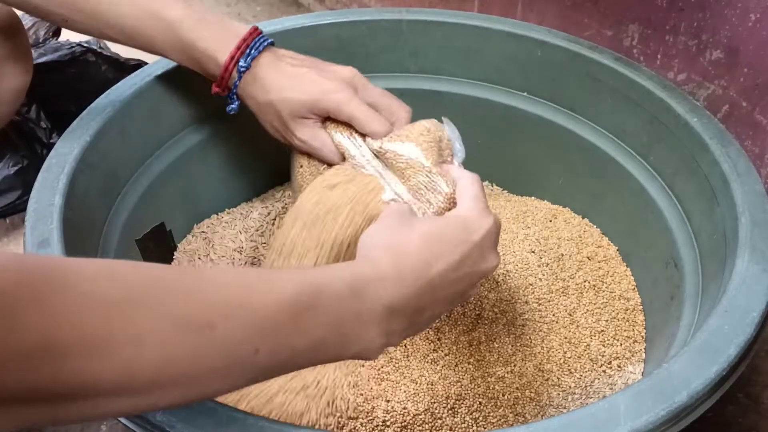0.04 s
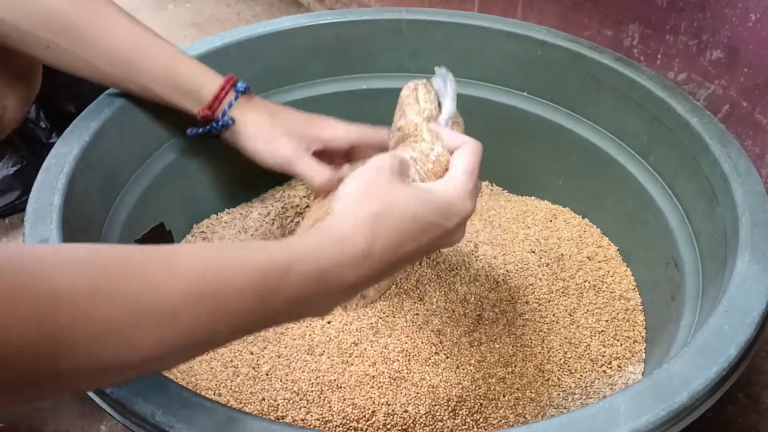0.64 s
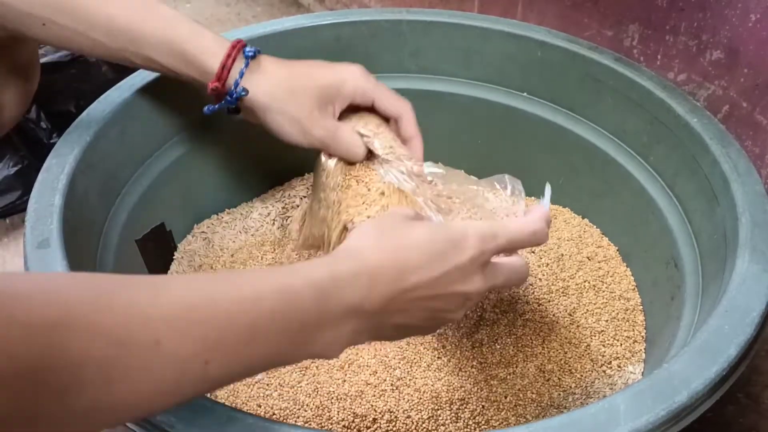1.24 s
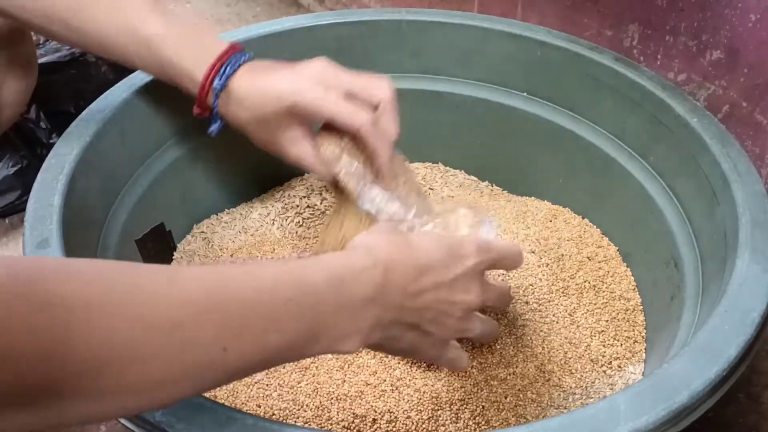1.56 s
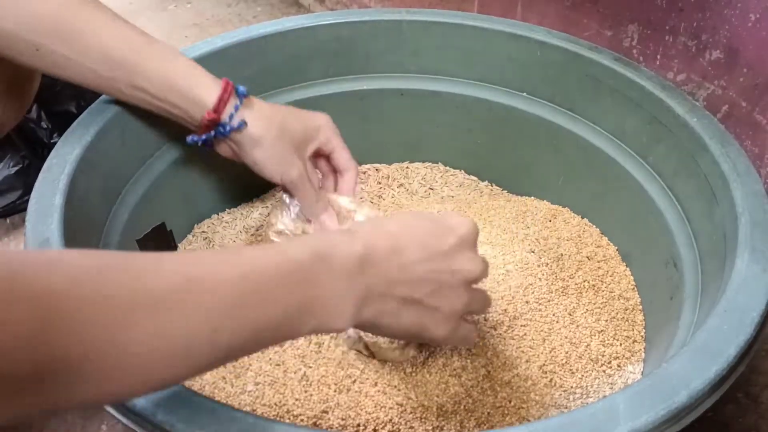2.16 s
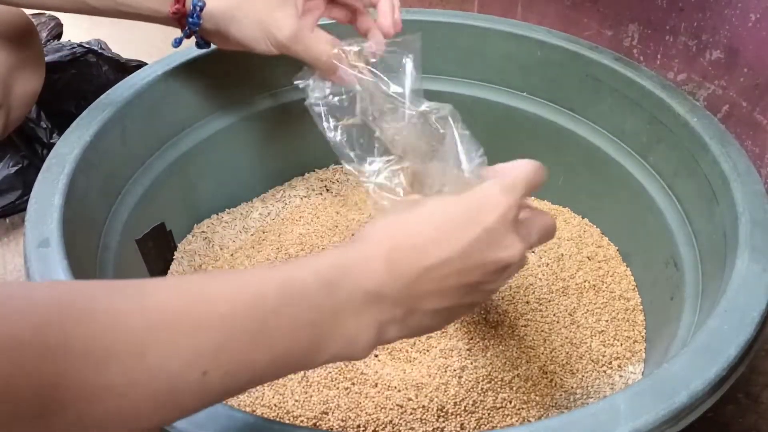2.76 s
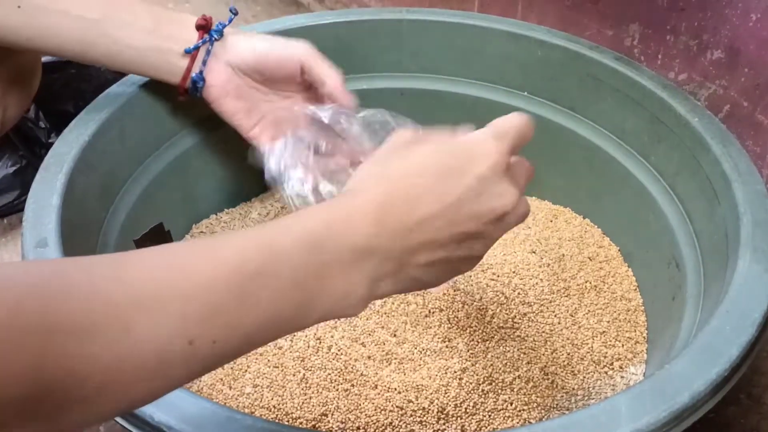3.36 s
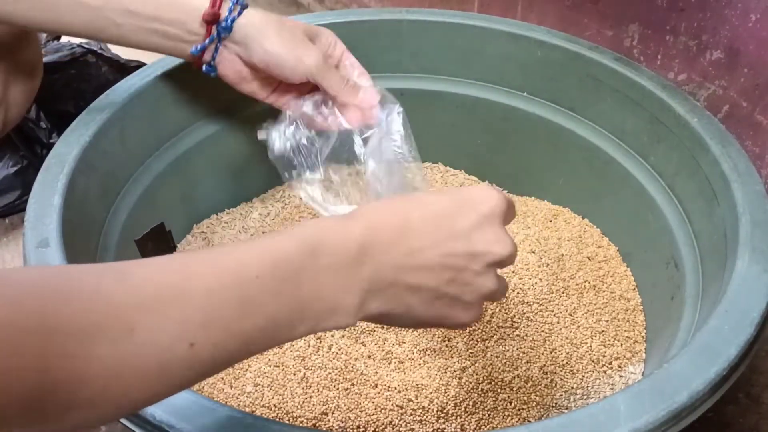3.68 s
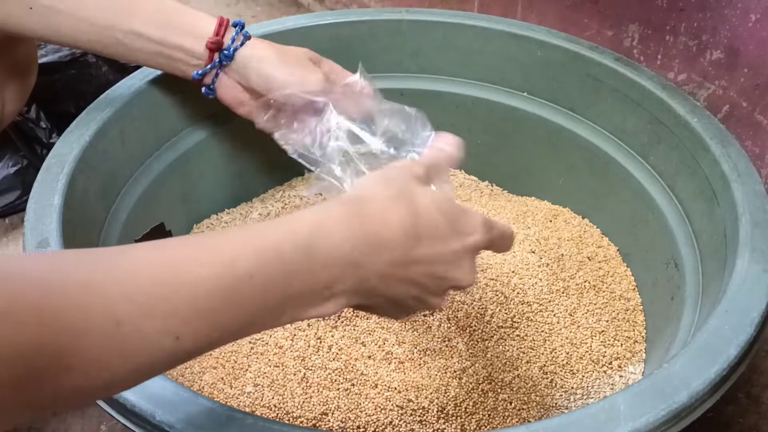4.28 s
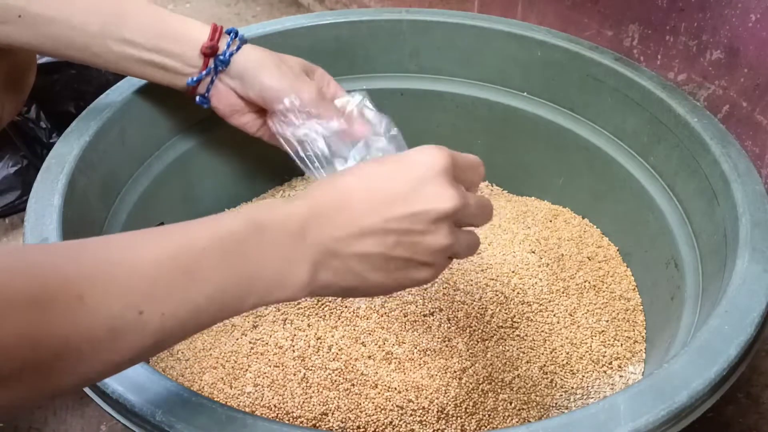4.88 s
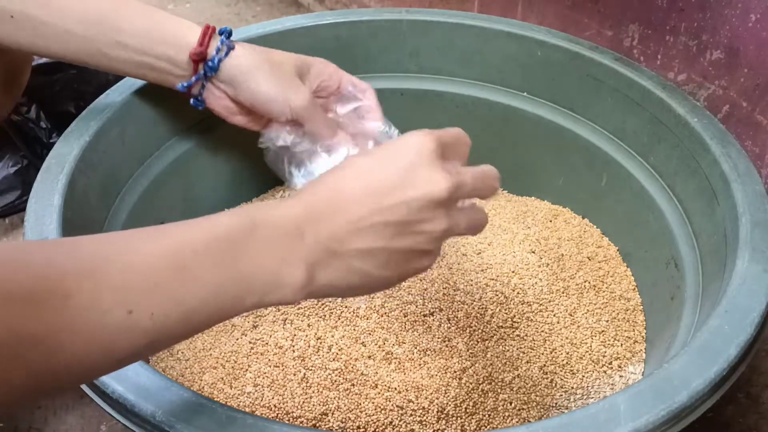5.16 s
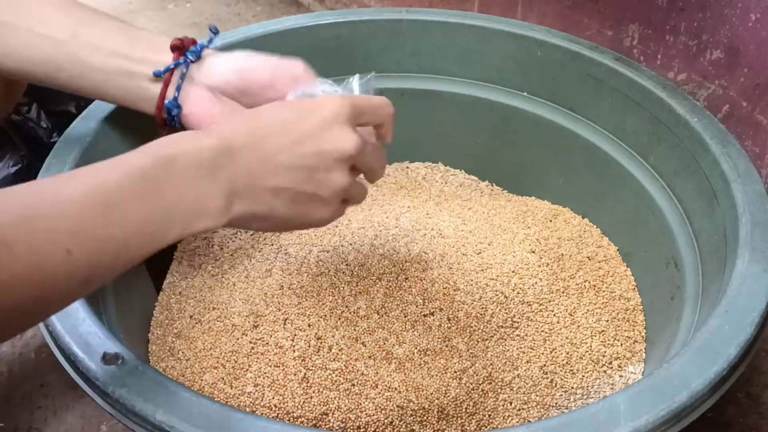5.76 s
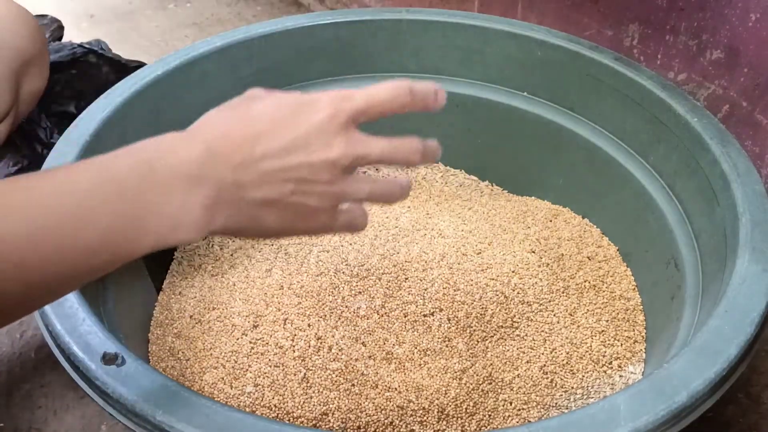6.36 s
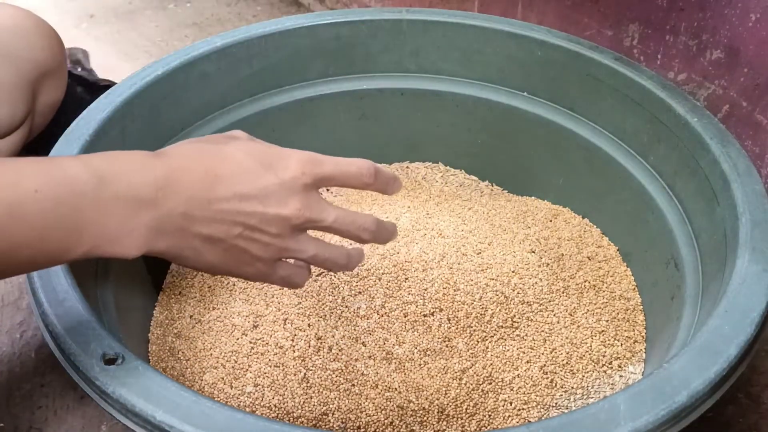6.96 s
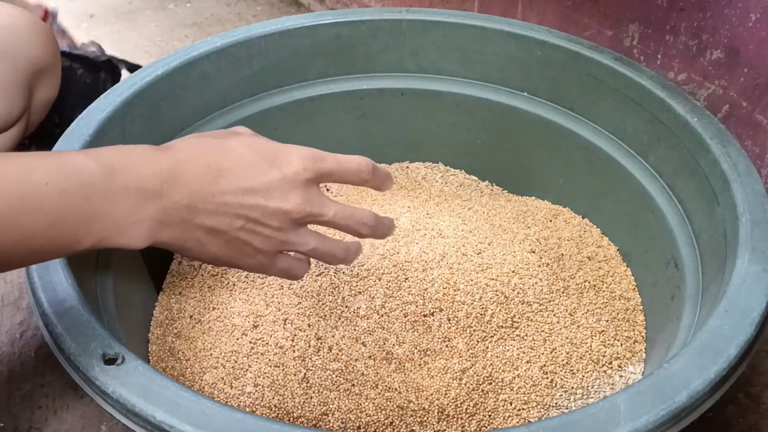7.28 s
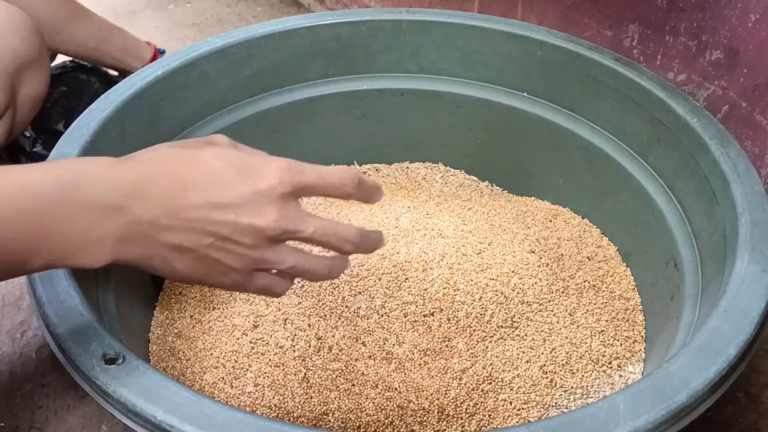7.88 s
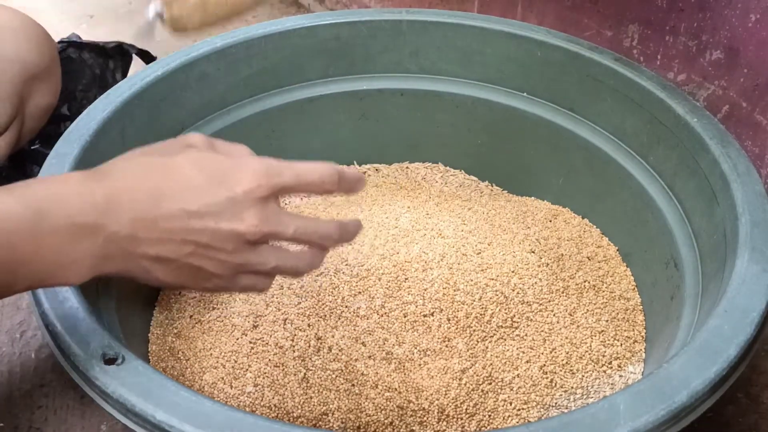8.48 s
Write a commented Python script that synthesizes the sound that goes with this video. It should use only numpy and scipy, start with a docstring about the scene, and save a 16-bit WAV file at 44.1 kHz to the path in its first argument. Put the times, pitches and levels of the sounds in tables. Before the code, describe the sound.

Close to the microphone, a fine, bright patter of seeds lands on grain in a plastic basin, with occasional sharp cracks from the bag they spill out of. The pour dies away, a parrot gives a loud squawk, and the thin empty bag crinkles in bursts before fading to light rustles. Brief whistles and raspy calls from small parrots echo in the room through most of this, above a low hum of faraway traffic.

```python
"""Small dry seeds pour from a thin plastic bag onto a heap of grain, thousands of tiny hits a second,
and the plastic basin under them murmurs. The empty bag is shaken out, crumpled and put aside,
crackling as its creases flip. Small parrots whistle and squawk in the hard-walled room, which echoes,
and traffic rumbles far off. A phone's two microphone openings each colour the treble in their own way."""
import sys
import numpy as np
from scipy import signal
from scipy.fft import rfft, irfft, next_fast_len
from scipy.io import wavfile
from scipy.ndimage import uniform_filter1d

SR = 44100
rng = np.random.default_rng(int(sys.argv[2]) if len(sys.argv) > 2 else 0)


def unload_audio(sound):
    """Save the sound as a 16-bit wav file, at the path given as the first command line argument."""
    columns = np.transpose(np.atleast_2d(sound))
    # keep every value between -1 and 1, then stretch to whole-number steps
    steps = np.round(np.clip(columns, -1, 1) * 32767)
    wavfile.write(sys.argv[1], SR, steps.astype(np.int16))


N = 376173
TIME = np.arange(N) / SR
CUTOFF_HZ = 15550   # the phone keeps nothing higher
CALL_RISE_S, CALL_FADE_S = 0.0027, 0.0052   # how fast a bird call starts and stops

# tone of the bag's thin plastic: (frequency [Hz], gain [dB])
BAG_TONE = [(100, -7), (250, -5), (450, -15.5), (1000, -6), (1700, -3), (2300, 3.5), (3200, 4), (5000, 4),
            (8000, 4), (12000, -2.5), (16000, -4.5)]


def seeds(stream):
    """Thousands of seeds a second tick on the heap; a stronger stream brings more of them."""
    # tone of seeds hitting grain: (frequency [Hz], gain [dB])
    seed_tone = [(100, -16), (250, -10), (450, -2.5), (1000, -3.5), (1700, -1), (2300, 3.5), (3200, 4),
                 (5000, 3), (8000, 3.5), (12000, -1.5), (16000, -1)]
    flow = stream * from_db(1.5 * drift(40))
    hits = ticks(per_s=14000 * flow / flow.max(), size_db=2.5, ring_s=0.00044)
    return flow * rms_one(colour(spread(hits), seed_tone))


def bag(effort):
    """The thin plastic buckles in little bursts of crackles, more of them when it is squeezed harder."""
    crackles = ticks(per_s=1200 + 6000 * effort / effort.max(), size_db=-0.4, ring_s=0.001)
    crackles *= from_db(1.4 * drift(70))
    return effort * rms_one(colour(spread(crackles), BAG_TONE))


def snaps(decay_s=0.0036, gain_db=-11):
    """A big crease in the bag flips over with a sharp crack."""
    # the biggest creases flipping: (time [s], level before gain_db [dB])
    flips = [(0.058, -21.5), (1.1383, -20), (1.57, -24), (1.7718, -18.5), (2.0902, -15), (2.4534, -17.5),
             (3.0236, -21), (3.666, -15), (4.8368, -21), (5.3432, -23.5), (6.2402, -31)]
    out = np.zeros((2, N + SR))
    t = TIME[:SR // 50]
    for s, db in flips:
        at = int(s * SR)
        crack = np.exp(-t / decay_s) * rng.standard_normal((2, len(t)))
        out[:, at:at + len(t)] += from_db(db + gain_db) * crack
    return colour(out[:, :N], BAG_TONE)


def creases(motion, gain_db=-14.5):
    """Whenever the bag moves, full or empty, small creases flip at random."""
    cracks = ticks(per_s=22, size_db=2.5, ring_s=0.0021)
    return from_db(gain_db) * motion * rms_one(colour(cracks, BAG_TONE))


def basin(drive):
    """Shifting grain drums softly on the plastic wall, which answers with a hollow murmur."""
    # tones at which the filled basin rings: (frequency [Hz], width [Hz], gain [dB])
    wall_tones = [(276, 22, -1.5), (381, 42, -0.5), (469, 51, 1.5), (659, 66, -2), (817, 140, -8),
                  (1280, 370, -10.5)]
    drumming = spread(ticks(per_s=1500, size_db=2.0, ring_s=0.00095))
    wall = np.zeros((2, N))
    for k, (hz, width, db) in enumerate(wall_tones):
        ringing = signal.lfilter(*signal.iirpeak(hz, hz / width, fs=SR), drumming)
        wall += (-1) ** k * from_db(db) * ringing   # every second tone swings the opposite way
    muffle = signal.butter(2, 1800, fs=SR, output="sos")
    return drive * rms_one(signal.sosfilt(muffle, wall))


def parrots():
    """The long cry and all the short calls, each placed at its time."""
    # short calls, from clear chirps to harsh squawks: (time [s], length [s], start pitch [Hz],
    # end pitch [Hz], level [dB], brightness [dB per octave], rasp [0-1])
    chirps = [(0.663, .013, 5340, 5385, -20, 7, .15), (0.787, 0.025, 2750, 2900, -30.5, -1, 0.94),
              (.797, 0.028, 2856, 2785, -20.5, -2, .05), (.82, 0.026, 2713, 2545, -19.5, 2.5, 0.3),
              (0.848, 0.044, 6720, 6660, -28.5, -8, .1), (0.922, 0.019, 4470, 4240, -22.5, -3, 0.53),
              (.941, .04, 2614, 2608, -25, 0, 0.61), (1.042, 0.035, 3780, 4200, -27, -20, 0.87),
              (1.06, .03, 2484, 2360, -33.5, -7, 0.8), (1.154, 0.081, 1890, 1710, -43, -7.5, 0.96),
              (1.974, 0.02, 4796, 4940, -20, -1, 0.28), (1.998, 0.054, 2370, 2290, -35.5, -3, 0.53),
              (2.07, 0.044, 2260, 2080, -47, -5, .3), (3.286, 0.015, 5500, 5540, -32, -9, 0.23),
              (3.317, 0.032, 4970, 5135, -24, 2.5, .5), (3.424, 0.015, 4256, 4200, -20.5, 4, 0.6),
              (3.426, 0.016, 2885, 2900, -18, 4.5, 0.89), (3.441, 0.031, 6130, 6450, -20, 2.5, 0.37),
              (3.583, 0.029, 2150, 2005, -36, -1.5, 0.2), (3.607, .012, 5560, 5870, -25, -2, 0.33),
              (3.992, 0.011, 2060, 2050, -37, -3, 0.04), (4.003, 0.035, 2604, 2630, -31.5, -2.5, 0.47),
              (4.06, 0.026, 6530, 5120, -22, -5, 0.2), (4.144, 0.024, 4484, 4244, -23, 2, 0.47),
              (4.146, 0.017, 5760, 5350, -27, -13, 0.4), (5.689, 0.024, 5710, 5360, -26, 1.5, 0.32),
              (5.828, 0.083, 3076, 3235, -41, -4, 0.97), (5.888, 0.034, 3355, 3487, -29, 4, 0.07),
              (5.919, 0.018, 5600, 5400, -36, -8, .1), (5.934, 0.031, 4320, 4110, -29.5, 7, 0.25),
              (6.263, 0.015, 7150, 6630, -35, -9, 0.1), (6.293, 0.031, 2260, 2680, -45, -9, 0.4),
              (6.32, .049, 4050, 4630, -37, 5, .55)]
    out = np.zeros(N + SR)
    calls = [long_cry()] + [(s, chirp(*row)) for s, *row in chirps]
    for s, call in calls:
        at = int(s * SR)
        out[at:at + len(call)] += call
    return out[:N]


def chirp(length, start_hz, end_hz, db, brightness_db, rasp):
    """A short call: the pitch glides along a slight arch while the level rises, holds and fades."""
    t = TIME[:SR // 10]
    along = np.minimum(t / length, 1)
    arch = 1 + 0.01757 * np.sin(np.pi * along)
    glide = (start_hz + (end_hz - start_hz) * along) * arch
    shape = np.clip(t / CALL_RISE_S, 0, 1) * np.clip((length - t) / CALL_FADE_S + .5, 0, 1)
    return from_db(db) * shape * bird_voice(glide, brightness_db, rasp)


def long_cry():
    """A hoarse call clears as it climbs, then drops and breaks off. Gives its start time and sound."""
    # course of the cry: (time [s], pitch [Hz], level [dB], rasp [0-1])
    course = [(6.453, 1647, -38, .5), (6.479, 1604, -35.5, 0.54), (6.497, 1630, -41, 0.1),
              (6.519, 1790, -30.5, .25), (6.594, 2043, -33, 0.23), (6.612, 1767, -31, 0.12),
              (6.622, 1696, -36, 0.2)]
    times, *columns = np.transpose(course)
    start, end = times[0], times[-1]
    t = start + TIME[:SR // 4]
    hz, db, rasp = [np.interp(t, times, column) for column in columns]
    shape = np.clip(np.minimum((t - start) / CALL_RISE_S, (end - t) / CALL_FADE_S), 0, 1)
    return start, from_db(db) * shape * bird_voice(hz, brightness_db=-5.5, rasp=rasp)


def bird_voice(glide, brightness_db, rasp):
    """A whistle with overtones, shaped by the throat; rasp shakes it into a hissing screech."""
    # how the throat lifts or weakens each overtone: (frequency [Hz], gain [dB])
    throat = [(1600, -6.5), (2200, 3), (2800, -6), (3700, 10), (5300, 3.5), (6600, 1), (8200, -5),
              (9400, -10.5), (11000, -7), (13500, -16), (16000, -21)]
    size = len(glide)
    quaver = .012 * drift(350, size)
    wobble = 0.085 * rasp * drift(1150, size)
    phase = 2 * np.pi * np.cumsum(glide * (1 + quaver + wobble)) / SR
    whistle = sum(from_db(at_hz(throat, k * glide) + brightness_db * np.log2(k)) * np.sin(k * phase)
                  for k in range(1, int(CUTOFF_HZ / glide.min()) + 1))
    flutter = 1 + 0.78 * np.tanh(2 * rasp * drift(900, size))
    hiss_band = signal.butter(2, [2500, 8500], "band", fs=SR, output="sos")
    hiss = signal.sosfilt(hiss_band, rng.standard_normal(size))
    return rms_one(whistle * flutter) + 0.18 * rasp * rms_one(hiss)


def bumps(swell_s=0.0097):
    """Soft thuds that swell and die within a few hundredths of a second."""
    # dull low thuds: (time [s], level [dB], rough pitch [Hz])
    thuds = [(.48, -54, 480), (1.969, -44.5, 350), (2.3, -55, 50), (3.446, -45, 140), (3.446, -47, 650),
             (5.551, -55, 340)]
    out = np.zeros(N + SR)
    t = TIME[:SR // 4]
    shape = t / swell_s * np.exp(1 - t / swell_s)
    for s, db, hz in thuds:
        band = signal.butter(2, [hz / 2, hz * 1.44], "band", fs=SR, output="sos")
        thud = rms_one(signal.sosfilt(band, rng.standard_normal(len(t))))
        at = int(s * SR)
        out[at:at + len(t)] += from_db(db) * shape * thud
    return out[:N]


def street(engine_hz=137):
    """Far traffic rumbles, and one engine drones with a wavering pitch and level."""
    # tone of the rumble: (frequency [Hz], gain [dB])
    traffic_tone = [(20, -7), (30, -5), (41, 12), (52, -6.5), (90, -3.5), (125, -1), (190, -2.5),
                    (270, -8.5), (400, -3), (700, -8.5), (1500, -11.5), (4000, -10.5), (16000, -26.5)]
    # loudness of the rumble: (time [s], level [dB])
    traffic_levels = [(0, -52), (1.3, -49), (3.3, -50), (4.3, -56), (5.6, -53.5), (7.2, -50), (8.53, -53)]
    # loudness of the engine: (time [s], level [dB])
    engine_levels = [(0, -91), (3, -69), (4.2, -66), (5.5, -67.5), (6.2, -61), (6.5, -67.5), (7.15, -54.5),
                     (7.5, -66.5), (8.53, -70)]
    rumble = rms_one(colour(spread(rng.standard_normal((2, N))), traffic_tone))
    phase = 2 * np.pi * np.cumsum(engine_hz * (1 + 0.013 * drift(17))) / SR
    drone = from_db(in_time(engine_levels) + 2.0 * drift(9)) * rms_one(np.sin(phase))
    return from_db(in_time(traffic_levels)) * rumble + drone


def swells(rows, rise_share=.48, steepness=2.2):
    """A loudness curve with one rounded rise and fall per row; overlapping ones add in power."""
    power = np.zeros(N)
    for s, length, db in rows:
        near = slice(max(int((s - 2 * length) * SR), 0), int((s + 2 * length) * SR))
        t = TIME[near] - s
        away = np.abs(t) / (length * np.where(t < 0, rise_share, 1 - rise_share))
        power[near] += (from_db(db) * np.exp(-away ** steepness)) ** 2
    return np.sqrt(power)


def ticks(per_s, size_db, ring_s):
    """Tiny random hits of uneven size; each is a short burst of noise, different left and right."""
    chance = np.clip(per_s / SR, 1e-4, 1)
    sizes = from_db(size_db * np.minimum(rng.exponential(1, N), 5))
    energy = (rng.random(N) < chance) * sizes ** 2 / chance
    fading = signal.lfilter([1], [1, -np.exp(-2 / (ring_s * SR))], energy + 1e-18)
    return rms_one(np.sqrt(fading) * rng.standard_normal((2, N)))


def echoes(x, fade_s, gap_s):
    """The walls send back a blur of echoes that starts after gap_s and falls 60 dB in fade_s."""
    t = TIME[:SR // 2]
    tail = rng.standard_normal((2, len(t))) * from_db(-60 * t / fade_s) * (t >= gap_s)
    tail /= np.sqrt(np.sum(tail ** 2, axis=1, keepdims=True) + 1e-20)
    return signal.oaconvolve(np.atleast_2d(x), tail, axes=1)[:, :N]


def spread(pair):
    """Two unrelated signals become left and right, alike in the bass only."""
    # how alike the two sides are: (frequency [Hz], likeness [0-1])
    likeness = [(40, 1), (130, 0.89), (300, 0.87), (640, 0.48), (1200, 0.23), (3000, 0.13), (7000, 0.069),
                (16000, 0.057)]
    size = next_fast_len(N)
    mid, side = rfft(pair, size)
    alike = np.clip(at_hz(likeness, np.fft.rfftfreq(size, 1 / SR)), -.99, .99)
    shared = np.sqrt((1 + alike) / 2) * mid
    opposite = np.sqrt((1 - alike) / 2) * side * [[1], [-1]]
    return irfft(shared + opposite, size)[:, :N]


def colour(x, points, size=4096):
    """Make each frequency louder or softer, following a table of (frequency [Hz], gain [dB])."""
    gains = from_db(at_hz(points, np.fft.rfftfreq(size, 1 / SR)))
    # fold the filter so that it rings only after a hit, never before (minimum phase)
    folded = irfft(np.log(gains))
    folded[1:size // 2] *= 2
    folded[size // 2 + 1:] = 0
    response = irfft(np.exp(rfft(folded)))
    return signal.oaconvolve(np.atleast_2d(x), response[None], axes=1)[:, :N]


def drift(rate, size=N):
    """A random curve that wanders by about 1 either way, with about `rate` turns a second."""
    knots = rng.standard_normal(size // 8 + 4)
    return np.interp(np.arange(size) / SR * rate, np.arange(len(knots)), knots)


def from_db(db):
    """Turn decibels into a number to multiply by."""
    return 10 ** (np.asarray(db) / 20)


def rms_one(x):
    """Scale a signal so that its average strength (rms) is 1."""
    return x / np.sqrt(np.mean(x ** 2) + 1e-20)


def in_time(rows):
    """Join (time [s], value) points with straight lines, one value per sample."""
    return np.interp(TIME, *np.transpose(rows))


def at_hz(points, hz):
    """Read between (frequency [Hz], value) points, with every octave equally wide."""
    freqs, values = np.transpose(points)
    return np.interp(np.log(hz + 1e-3), np.log(freqs), values)


def gain_control(x, ceiling_db=-8.0, recovery_db_per_s=4.0):
    """A very loud moment makes the phone turn itself down at once; the level then creeps back."""
    power = uniform_filter1d(np.mean(x ** 2, axis=0), size=600)
    level_db = 10 * np.log10(np.abs(power) + 1e-12)
    excess_db = np.maximum(level_db - ceiling_db, 0)
    recovery_db = recovery_db_per_s * TIME
    held_db = np.maximum.accumulate(excess_db + recovery_db) - recovery_db
    return x * from_db(-held_db)


def scene():
    """Seeds and bag are close and both stir the basin; the birds are further off and fill the room."""
    # stream of seeds landing on the heap: (time [s], level [dB])
    pour = [(0, -41), (.16, -35), (.28, -42), (.4, -37), (.5, -37.5), (.66, -43.5), (1.2, -38.5),
            (1.39, -45.5), (1.49, -40), (1.7, -40.5), (1.87, -39), (1.94, -41.5), (2.06, -35),
            (2.22, -39.5), (2.48, -35.5), (2.68, -40), (2.9, -37.5), (3.25, -47.5), (3.8, -62)]
    # hands squeezing the empty bag: (time of peak [s], length [s], level [dB])
    squeezes = [(3.67, 0.14, -35.5), (3.85, 0.22, -39.5), (4.04, 0.11, -37), (4.13, 0.14, -37),
                (4.23, 0.069, -34.5), (4.46, 0.13, -35.5), (4.61, 0.16, -33.5), (4.745, 0.12, -33.5),
                (4.868, 0.12, -30), (5.007, 0.079, -32), (5.12, 0.19, -35), (5.245, 0.083, -34),
                (5.43, 0.1, -40.5), (5.497, .018, -32), (5.57, 0.12, -33.5), (5.72, 0.2, -37),
                (5.86, 0.16, -36.5), (5.98, 0.3, -36), (6.125, 0.097, -40.5), (6.3, 0.22, -41.5),
                (6.48, 0.082, -41), (6.73, 0.13, -42), (6.85, 0.13, -38), (7.1, 0.18, -41.5),
                (7.27, .1, -42.5), (7.41, 0.28, -47.5), (7.86, .04, -48), (8.01, 0.18, -48.5),
                (8.22, 0.073, -49), (8.52, 0.018, -51)]
    # light rustle of the bag between squeezes: (time [s], level [dB])
    rustle = [(0, -74), (3.5, -50.5), (4.4, -40), (5.3, -43.5), (6, -48), (6.22, -67), (7, -44.5),
              (7.75, -63.5), (8.53, -69)]
    # dull rubs, and at 3.46 s a low thump as the loudest squawk overloads the microphone:
    # (time of peak [s], length [s], level [dB])
    rubs_and_thump = [(.5, 0.1, -44.5), (2.43, 0.38, -51.5), (3, 0.085, -47.5), (3.46, 0.053, -44),
                      (5.56, 0.037, -44), (6.53, .1, -57.5), (6.8, 0.31, -49.5), (7.1, 0.85, -52.5),
                      (7.86, 0.048, -51), (7.98, .04, -48.5), (8.46, 0.21, -56)]
    stream = from_db(in_time(pour))
    effort = np.hypot(swells(squeezes), from_db(in_time(rustle)))   # hypot adds in power
    motion = np.hypot(stream, effort)
    murmur_level = np.hypot(from_db(-16.5) * motion, swells(rubs_and_thump))
    near = seeds(stream) + bag(effort) + snaps() + creases(motion)
    near = near + from_db(-7.5) * echoes(near, fade_s=0.15, gap_s=0.0019)
    calls = parrots()
    calls = calls + from_db(2.46) * echoes(calls, fade_s=0.22, gap_s=0.0023)
    return near + calls + basin(murmur_level) + bumps() + street()


def record(dry):
    """The phone colours each side, holds down and rounds off loud peaks, and cuts the highest treble."""
    # peaks and dips of the left microphone opening: (frequency [Hz], gain [dB])
    left_opening = [(400, -1), (3000, 0.5), (4600, -1), (5800, -5), (6400, -11), (7200, -7), (8200, 3.5),
                    (9200, 13), (10700, 13), (12000, 8), (13500, 4), (14400, -19), (15300, -24)]
    # peaks and dips of the right one: (frequency [Hz], gain [dB])
    right_opening = [(400, 0), (2000, 0), (3100, 5.5), (4000, 2), (5000, 5), (6750, 14), (8000, 3),
                     (9000, -4), (9700, -5), (10600, -4), (12000, 6), (13300, 9), (14700, 16),
                     (15500, 15.5)]
    coloured = np.vstack([colour(dry[0], left_opening), colour(dry[1], right_opening)])
    rounded = .8 * np.tanh(gain_control(coloured) / .8)
    treble_cut = signal.ellip(12, .1, 80, CUTOFF_HZ, fs=SR, output="sos")
    return signal.sosfilt(treble_cut, rounded)


dry = scene()
out = record(dry)
unload_audio(out)
```